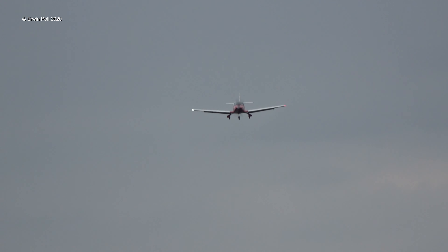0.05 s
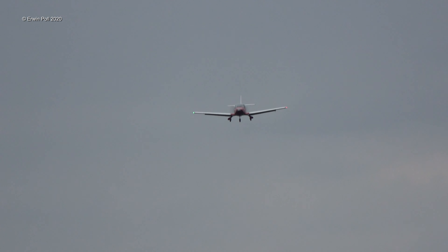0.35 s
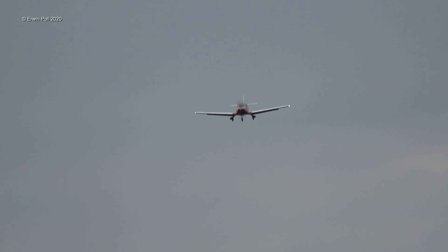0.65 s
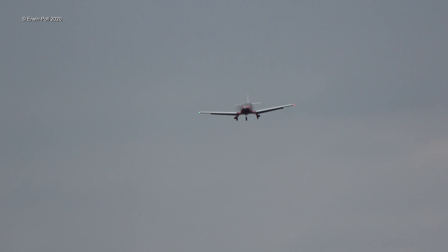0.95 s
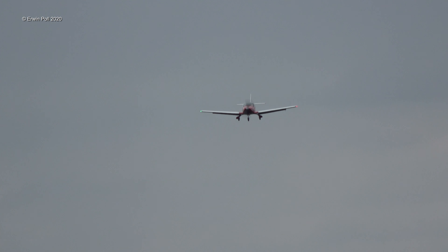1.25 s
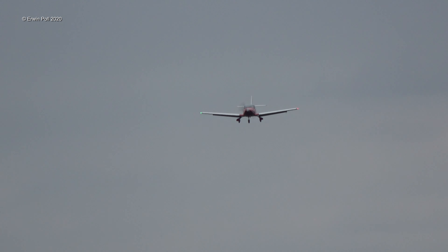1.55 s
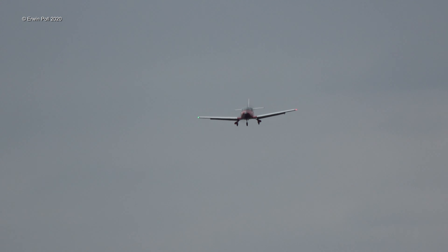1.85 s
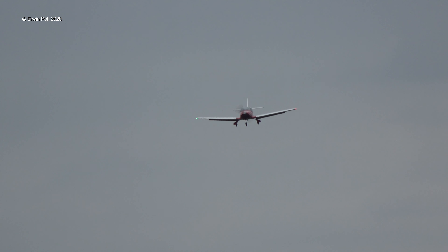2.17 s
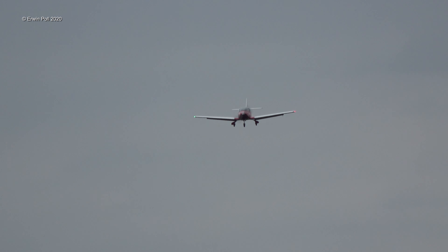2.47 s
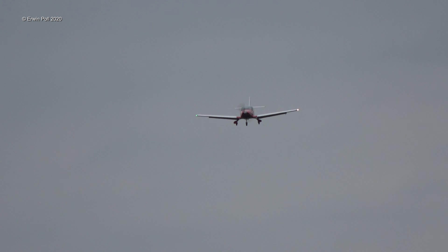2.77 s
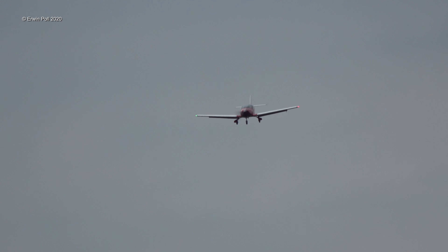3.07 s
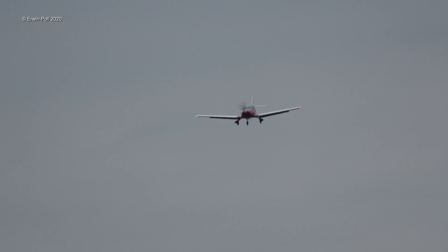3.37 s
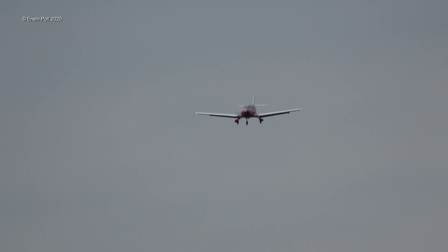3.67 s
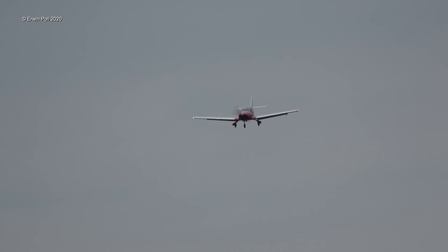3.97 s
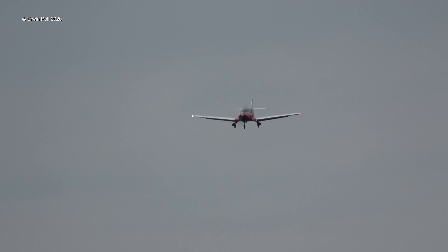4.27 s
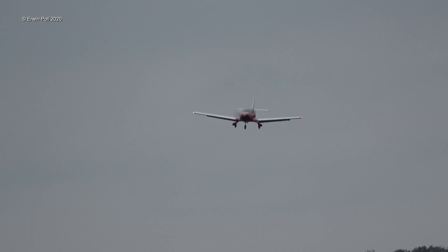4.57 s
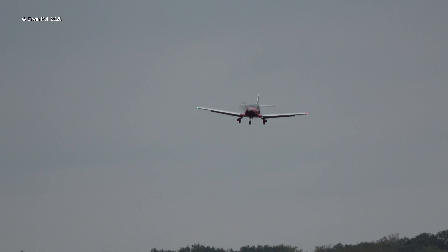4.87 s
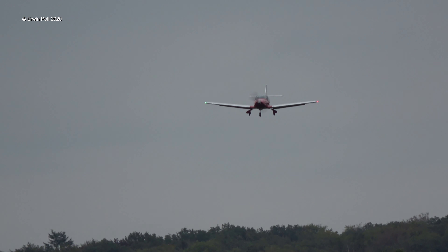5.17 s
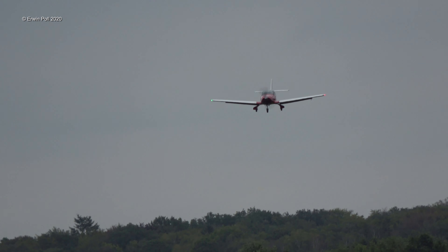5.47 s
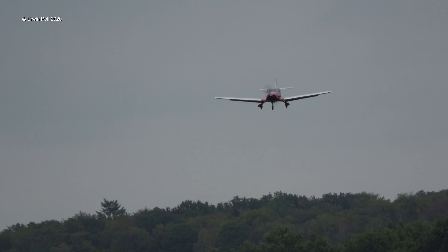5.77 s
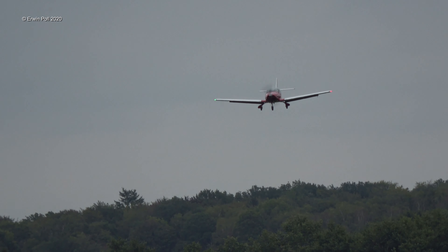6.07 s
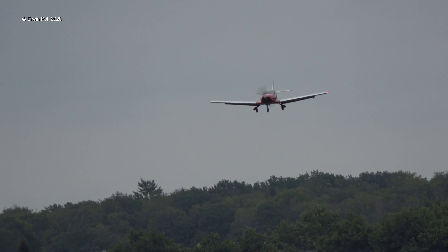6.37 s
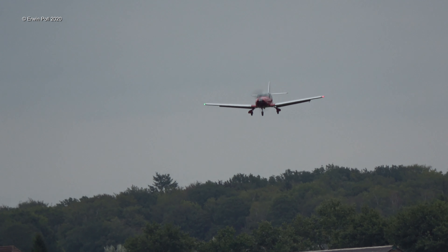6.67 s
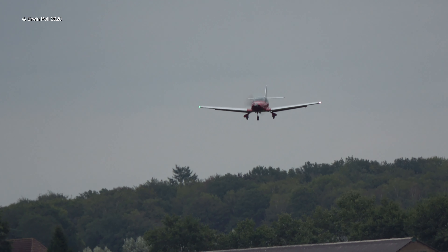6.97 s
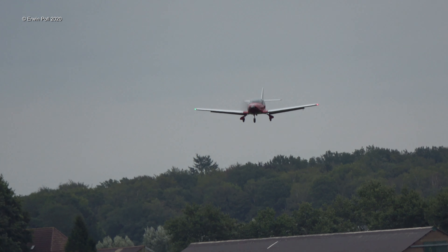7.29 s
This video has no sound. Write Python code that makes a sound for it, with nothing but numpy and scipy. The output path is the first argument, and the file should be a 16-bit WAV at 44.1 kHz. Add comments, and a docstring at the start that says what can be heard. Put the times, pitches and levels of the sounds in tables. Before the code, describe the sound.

A small propeller plane approaches with its engine throttled back, throbbing and crackling louder as wind gusts buffet the microphone.

```python
"""From the edge of an airfield: a light aircraft glides in on final approach, piston engine throttled back.
At first it is some 340 m off, a throb of propeller and exhaust with a faint whine and a rush of air,
while gusts buffet the microphone and briefly pin its diaphragm. The ground returns the aircraft's hiss
and whine about 10 ms late. Past halfway the wind eases and the aircraft swells as it closes to
about 120 m, its exhaust rasping, spitting and cracking ever harder."""
import sys
import numpy as np
from scipy import signal
from scipy.fft import rfft, irfft, next_fast_len
from scipy.io import wavfile
from scipy.ndimage import uniform_filter1d, map_coordinates

SR = 44100
rng = np.random.default_rng(int(sys.argv[2]) if len(sys.argv) > 2 else 0)


def wav_record(signal):
    """Record a signal, one row per channel, as 16-bit PCM in the file named by sys.argv[1]."""
    frames = np.transpose(np.atleast_2d(signal))
    bounded = np.clip(frames, -1, 1)
    # unit amplitude maps onto the largest positive 16-bit level
    quanta = np.round(bounded * 32767).astype(np.int16)
    wavfile.write(sys.argv[1], SR, quanta)


N = 327663
TIME = np.arange(N) / SR

# background of the open airfield: frequency_hz, relative_db
FIELD_SPECTRUM = [(40, 7), (150, -2), (300, 2.5), (430, -6), (600, -4), (1250, -3), (2500, -15),
                  (6000, -16), (10000, -29), (15500, -42)]
# faint left-right difference in that background: frequency_hz, relative_db
SIDE_SPECTRUM = [(30, 33), (300, -7.5), (600, -2.5), (3000, -31.5), (15000, -41.5)]
# eddies at the microphone: frequency_hz, relative_db
EDDY_SPECTRUM = [(5, 8), (11, 13), (22, -5), (35, -4.5), (50, -6.5), (80, -21.5), (150, -33), (300, -66),
                 (1000, -108)]
# light wind between the gusts: time_s, level_db
BREEZE_LEVEL = [(0, -21.5), (3.4, -21), (4.3, -22.5), (5.4, -28.5), (7.43, -24.5)]
# gusts on the microphone: crest_s, length_s, level_db, rocking_hz
MIC_GUSTS = [(0.044, 0.25, -7, 28), (0.148, 0.084, 0.5, 19.45), (0.232, 0.12, -1, 16.09),
             (0.345, 0.11, -9, 18.74), (0.428, 0.08, -8.5, 16), (0.647, 0.066, -6.5, 22),
             (0.928, 0.11, -5.5, 25), (0.99, 0.026, 2, 20.74), (1.064, 0.045, 1.5, 24.98),
             (1.115, 0.032, 0, 19.92), (1.184, 0.04, -0.5, 19.6), (1.239, 0.06, -5.5, 15.73),
             (1.34, 0.06, -5, 15.72), (1.42, 0.087, -14, 16.11), (1.499, 0.14, -5.5, 14),
             (1.772, 0.08, -9, 14), (2.006, 0.021, -2, 22), (2.144, 0.18, -6.5, 15.04),
             (2.252, 0.04, -2.5, 19), (2.465, 0.082, -4, 17), (2.627, 0.074, -9, 21),
             (2.753, 0.038, -1, 21), (2.855, 0.1, -7.5, 13.86), (3.019, 0.13, -8, 13.44),
             (3.185, 0.05, -6.5, 21.9), (3.223, 0.025, -1, 20.4), (3.264, 0.025, -1.5, 24.2),
             (3.315, 0.065, -4, 20.7), (3.453, 0.13, -12, 14.66), (3.622, 0.048, -10, 18),
             (3.883, 0.22, -17, 18), (4.192, 0.083, -17, 15), (4.608, 0.11, -18.5, 15),
             (5.009, 0.088, -9.5, 16), (6.372, 0.14, -16, 18), (6.439, 0.095, -9.5, 20),
             (6.65, 0.11, -16.5, 13), (7.105, 0.087, -11, 23)]
# thuds of the hardest eddies: crest_s, level_db, upper_edge_hz, side_db
EDDY_THUDS = [(0.125, -26.5, 230, -12), (0.166, -16, 80, -39), (0.236, -20.5, 150, -41),
              (0.649, -19, 69, -39), (0.925, -28.5, 297, -5), (0.954, -18, 100, -5), (1.055, -18, 140, -31),
              (1.07, -30.5, 188, -35), (1.098, -33, 250, -34), (1.192, -28.5, 121, -33),
              (2.253, -24, 62, -34), (2.486, -24, 61.7, -40), (2.633, -24, 70, -37),
              (2.752, -22.5, 70, -40), (3.249, -34, 220, -37)]
# gusts that pin the diaphragm: centre_s, length_s, depth_db
MIC_STALLS = [(0.134, 0.021, -14), (0.94, 0.03, -37), (2.031, 0.017, -25)]
# lag of the ground reflection at the microphone: time_s, lag_ms
GROUND_LAG = [(0, 9.77), (3.9, 9.82), (5, 10.05), (6, 10.25), (7.43, 10.8)]
# the treble lies deep at first, then swells and fades: time_s, gain_db
TREBLE_SWING = [(0, -14), (.8, -19), (1.12, -25.5), (1.52, -1), (3.0, -1), (3.95, 1), (4.3, 0), (4.95, 6),
                (5.35, -2.5), (5.8, -4.5), (6.08, 2.5), (6.5, -3), (6.93, 2.5), (7.15, -4.5), (7.43, -5.5)]
# air over propeller and airframe: frequency_hz, relative_db
RUSH_SPECTRUM = [(150, 7.5), (300, -3.5), (420, -4.5), (650, 3), (1000, 0.5), (1600, 0), (2200, -1),
                 (2650, -6.5), (3300, -4), (4300, -9), (5500, -10.5), (8000, -17.5), (10000, -21),
                 (15500, -27)]
# slow swell of that air: time_s, gain_db
AIR_SWELL = [(0, 1), (1.2, -0.5), (2.6, -0.5), (4.5, 0), (6, 2), (7, 1.9), (7.43, 2.5)]
# crankshaft speed: time_s, turns_per_s
CRANK_SPEED = [(0.3, 32.741), (1.3, 32.572), (2.0, 32.799), (2.75, 32.885), (3.55, 32.472), (4.15, 33.146),
               (4.7, 32.361), (5.15, 32.968), (5.8, 32.765), (6.3, 32.786), (6.7, 32.997)]
# whining engine tones: pitch_hz, width_hz, level_db
WHINE_TONES = [(509.8, 11.13, -62.5), (529.7, 7, -59.5), (611, 9, -72), (805, 5, -62.5), (1151, 16, -62)]
# throaty resonances of the exhaust pipe: centre_hz, width_hz, relative_db
PIPE_RESONANCES = [(967, 300, -1.5), (1514, 206, -1.5)]
# hiss of an exhaust puff: frequency_hz, relative_db
PUFF_SPECTRUM = [(400, -9), (900, -11.5), (1700, -12), (2100, -3), (2650, -19), (3400, -1), (4200, 3),
                 (5500, 1.5), (7200, 2), (9000, -3.5), (12500, -13.5), (15500, -28)]
# snap at the front of a puff: frequency_hz, relative_db
SNAP_SPECTRUM = [(1500, -13), (3500, 5.5), (7200, -4.5), (10000, -7.5), (15500, -5)]
# the sharpest exhaust cracks: near_s, high_whistle_db, high_whistle_hz, low_whistle_db, hiss_db
EXHAUST_CRACKS = [(3.415, -40.5, 3840, -43, -53), (2.077, -42, 3205, -40.5, -50),
                  (4.091, -50, 3380, -50, -43.5), (4.119, -45, 3090, -44, -44), (4.24, -46, 3490, -50, -43),
                  (4.152, -44, 3490, -50, -41.5), (4.272, -42, 3410, -47, -40.5),
                  (4.36, -48, 3390, -39, -40), (4.455, -38, 3434, -57, -44), (4.545, -37.5, 3480, -52, -45),
                  (4.637, -47, 3570, -34, -40), (4.883, -39, 3880, -41, -46), (4.945, -37, 3474, -56, -44),
                  (4.575, -35, 3430, -57, -41.5), (4.606, -39, 3520, -43, -37),
                  (4.853, -44, 3526, -42, -36), (4.975, -32.5, 3370, -49, -42),
                  (5.005, -36, 3440, -32, -39), (5.097, -39, 3395, -35, -42), (5.248, -37, 3490, -36, -47),
                  (5.339, -35.5, 3410, -37, -46), (5.368, -33.5, 3090, -49, -47),
                  (5.43, -34.5, 3410, -53, -45), (5.582, -42, 3450, -55, -36.5),
                  (5.612, -36, 3570, -35, -40), (5.704, -35, 3440, -35, -37), (5.766, -32, 3600, -50, -41),
                  (5.827, -34.5, 3360, -36, -40.5), (5.858, -38, 3840, -37.5, -46),
                  (5.888, -40, 3740, -39, -41), (6.132, -42, 3550, -45, -38.5), (6.68, -42, 3490, -34, -44),
                  (6.71, -37, 3035, -33, -43), (6.892, -38, 3150, -51, -43), (7.013, -36, 3330, -52, -39),
                  (6.010, -37, 3700, -52, -36.5), (6.100, -33.5, 3020, -44, -36),
                  (6.800, -26, 3370, -39, -37.5), (6.832, -49, 3400, -32, -42),
                  (6.923, -32, 3420, -29.5, -34), (6.952, -33, 4020, -36, -36),
                  (7.105, -30, 3460, -36, -40), (7.165, -33, 3345, -34, -37.5),
                  (7.347, -40, 3660, -38, -33.5), (7.378, -31, 3120, -49, -36),
                  (7.407, -33, 3300, -34, -38)]
# tones of the two-bladed propeller: crank_multiple, relative_db
PROPELLER_ORDERS = [(2, 5), (4, 0.5), (6, -16), (8, -32), (12, -35)]
# exhaust boom; uneven cylinders give half orders: crank_multiple, relative_db
BOOM_ORDERS = [(1, -24), (2.5, -4.5), (3, 5.5), (3.5, -5), (4.5, -35.5), (5, -8), (5.5, -26), (6.5, -23),
               (7, -21), (9, -33), (11, -54.5)]
# every second cycle differs, so the engine lopes: crank_multiple, relative_db
LOPE_ORDERS = [(2.25, -26), (2.75, -16.5), (3.75, -20), (4.25, -39), (4.75, -21), (5.75, -35.5)]

START_DISTANCE_M, CLOSING_M_PER_S = 336.3, 28.75
FIRING_TURN, BLADE_TURN, BOOM_TURN = .78, .02, 3.27   # crank positions of puff, blade passage and boom
# base level at the starting distance, and the dB gained for each dB of nearness
RUSH_DB, RUSH_GROWTH = -48, 1.26
RASP_DB, RASP_GROWTH = -69, 2.88
SPIT_DB, SPIT_GROWTH = -57, 2
DRONE_DB, DRONE_GROWTH = -31.5, 1.376
WHINE_GROWTH, LOPE_GROWTH = 0.13, 0.64
HIGH_WHISTLE_HZ, LOW_WHISTLE_HZ = 3403, 2130   # of the exhaust stack
SNAP_DELAY_S, SNAP_KNEE_DB, SNAP_STEEPENING = .001, -41.5, 0.73   # harder puffs snap more sharply


def from_db(db):
    return 10 ** (np.asarray(db) / 20)


def rms_one(x):
    return x / np.sqrt(np.mean(x ** 2) + 1e-20)


def in_time(rows):
    """Each column after the time column, sample by sample."""
    time_s, *columns = np.transpose(rows)
    return [np.interp(TIME, time_s, column) for column in columns]


def shaped_noise(gain_at):
    """Noise of rms 1 whose spectrum is the given function of frequency."""
    size = next_fast_len(N)
    hz = np.maximum(np.fft.rfftfreq(size, 1 / SR), 1)
    return rms_one(irfft(rfft(rng.standard_normal(size)) * gain_at(hz), size)[:N])


def noise(spectrum):
    """Noise of rms 1 coloured by rows of frequency_hz, relative_db."""
    points_hz, db = np.transpose(spectrum)
    return shaped_noise(lambda hz: from_db(np.interp(np.log(hz), np.log(points_hz), db)))


def drift(rate_hz):
    """A smooth random wander with spread 1."""
    step = 32
    size = next_fast_len(N // step + 2)
    rolloff = np.exp(-(np.fft.rfftfreq(size, step / SR) / rate_hz) ** 2)
    slow = irfft(rfft(rng.standard_normal(size)) * rolloff, size)
    return np.interp(np.arange(N) / step, np.arange(size), rms_one(slow))


def bursts(starts_s, levels_db, rise_s):
    """Envelope of puffs that swell to their level and die away."""
    kicks = np.zeros(N)
    kicks[np.clip(np.round(starts_s * SR).astype(int), 0, N - 1)] = from_db(levels_db)
    decay = np.exp(-1 / (rise_s * SR))
    return signal.lfilter([0, np.e * decay / (rise_s * SR)], [1, -2 * decay, decay ** 2], kicks + 1e-18)


def airfield():
    """The steady hush of open ground around the microphone."""
    return from_db(-49.5) * noise(FIELD_SPECTRUM)


def wind(rocking_db, eddy_db, wander):
    """Each gust rocks the diaphragm at its own pace; finer eddies ride on gusts and breeze."""
    bells = (from_db(db) * np.exp(-(2 * (TIME - s) / length) ** 2) for s, length, db, _ in MIC_GUSTS)
    gusts = np.sqrt(sum(bell ** 2 for bell in bells))
    rocking_hz = in_time(MIC_GUSTS)[2] * np.exp(wander * drift(40.7))
    rocking = rms_one(np.sin(2 * np.pi * (np.cumsum(rocking_hz) / SR + rng.random())))
    eddies = noise(EDDY_SPECTRUM)
    eddies /= np.sqrt(uniform_filter1d(eddies ** 2, size=3500) + 0.0083)   # even out their level
    eddy_gain = np.hypot(from_db(eddy_db) * gusts, from_db(in_time(BREEZE_LEVEL)[0]))
    rumble = from_db(rocking_db) * gusts * rocking + eddy_gain * eddies
    return signal.sosfilt(signal.butter(1, 5, "high", fs=SR, output="sos"), rumble)


def thuds(gain_db, rise_s, low_hz):
    """The hardest eddies thud, a little differently on each side of the microphone."""
    out, age = np.zeros((2, N)), TIME[:SR // 5]
    envelope = age / rise_s * np.exp(1 - age / rise_s)
    for crest_s, db, edge_hz, side_db in EDDY_THUDS:
        dull = signal.butter(2, [low_hz, edge_hz], "band", fs=SR, output="sos")
        eddy = signal.sosfilt(dull, rng.standard_normal((2, 2 * len(age))))[:, len(age):] * envelope
        mid, side = eddy * np.linalg.norm(envelope) / np.linalg.norm(eddy, axis=1, keepdims=True)
        thud = mid + from_db(side_db) * np.array([side, -side])
        start = int((crest_s - rise_s) * SR)
        out[:, start:start + len(age)] += from_db(db + gain_db) * thud
    return out


def mic_sensitivity():
    """A pinned diaphragm passes hardly any sound, and comes free abruptly."""
    return from_db(sum(db * np.exp(-(2 * (TIME - s) / length) ** 8) for s, length, db in MIC_STALLS))


def nearness_db():
    """Gain by spherical spreading as the aircraft closes on the microphone at a steady speed."""
    distance_m = START_DISTANCE_M - CLOSING_M_PER_S * TIME
    return 20 * np.log10(START_DISTANCE_M / distance_m)


def over_ground(direct, share):
    """The ground bounce combs the sound; the comb slides down as the aircraft nears."""
    lag_s = in_time(GROUND_LAG)[0] / 1000
    return direct + share * map_coordinates(direct, [(TIME - lag_s) * SR], order=3)


def treble_tilt(x, treble_db, edge_hz):
    """Raises or lowers what lies above the edge."""
    low = signal.sosfiltfilt(signal.butter(2, edge_hz, fs=SR, output="sos"), x)
    return low + from_db(treble_db) * (x - low)


def engine_whine(waver_db):
    """A few engine tones, each wandering a little in pitch and level."""
    tones = 0
    for pitch_hz, width_hz, db in WHINE_TONES:
        phase = 2 * np.pi * np.cumsum(pitch_hz + width_hz / 2 * drift(13.6)) / SR
        tones += from_db(db + waver_db * drift(25.0)) * rms_one(np.sin(phase))
    return tones


def rushing_air(turns, rush_db, chop, flutter_db):
    """Broad noise of propeller and airframe, chopped by two blades and stirred by the air on its way."""
    blades = 1 + chop * np.cos(4 * np.pi * (turns - FIRING_TURN))
    return from_db(rush_db + flutter_db * drift(58)) * blades * noise(RUSH_SPECTRUM)


def exhaust_rasp(turns, rasp_db, grain_db, pulsing):
    """The pipe resonances growl unevenly under the two firings of each turn."""
    beat = 1 + pulsing * np.cos(4 * np.pi * (turns - FIRING_TURN))
    growl = 0
    for centre_hz, width_hz, db in PIPE_RESONANCES:
        ring = shaped_noise(lambda hz: 1 / (1 + (2 * (hz - centre_hz) / width_hz) ** 2))
        growl += from_db(db + grain_db * np.tanh(drift(37))) * ring
    return from_db(rasp_db) * beat * growl


def stack_whistle(firings_s, pitches_hz, smear):
    """A hoarse tone of the exhaust stack that takes a new pitch at each puff."""
    latest = np.clip(np.searchsorted(firings_s, TIME) - 1, 0, None)
    return rms_one(np.sin(2 * np.pi * np.cumsum(pitches_hz[latest]) / SR + smear * drift(240)))


def exhaust_spit(turns, spit_db, snap_db, scatter_db, lope_db, sputter_db):
    """Once a turn the stack spits a snap, a puff of hiss and two whistles, harder every second turn."""
    count = np.arange(int(turns[-1]))
    firings_s = np.interp(count + FIRING_TURN, turns, TIME)
    chance = rng.uniform(-1, 1, (len(count), 6)).T
    level_db = np.interp(firings_s, TIME, spit_db) + scatter_db * chance[0] + lope_db * (-1) ** count
    hiss_db = level_db - 0.5
    high_db = level_db + 1 + 3 * chance[1]
    low_db = level_db - 1 + 4 * chance[2]
    high_hz = HIGH_WHISTLE_HZ * (1 + 0.13 * chance[3])
    low_hz = LOW_WHISTLE_HZ * (1 + 0.064 * chance[4])
    # each sharp crack takes over the firing nearest to it
    near_s, *cracks = np.transpose(EXHAUST_CRACKS)
    nearest = np.abs(firings_s[:, None] - near_s).argmin(axis=0)
    high_db[nearest], high_hz[nearest], low_db[nearest], hiss_db[nearest] = cracks
    sputter = from_db(sputter_db * np.tanh(drift(450)))
    puffs = bursts(firings_s, hiss_db - 0.5, rise_s=0.0019) * sputter * noise(PUFF_SPECTRUM)
    high = bursts(firings_s, high_db, rise_s=0.0014) * stack_whistle(firings_s, high_hz, smear=0.82)
    low = bursts(firings_s, low_db, rise_s=0.0019) * stack_whistle(firings_s, low_hz, smear=0.71)
    front_db = hiss_db + snap_db + SNAP_STEEPENING * (hiss_db - SNAP_KNEE_DB) + 3 * chance[5]
    snaps = bursts(firings_s + SNAP_DELAY_S, front_db, rise_s=0.00033) * noise(SNAP_SPECTRUM)
    return puffs + snaps + high + low


def crank_pulses(orders, turns, pipe_q=0, pipe_order=3):
    """A pulse train locked to the crank; a resonant pipe shifts the phases so each pulse rings on."""
    pulses = 0
    for multiple, db in orders:
        pipe_phase = np.arctan(pipe_q * (multiple / pipe_order - pipe_order / multiple))
        pulses += from_db(db) * np.cos(2 * np.pi * multiple * turns - pipe_phase)
    return pulses


def drone(turns, drone_db, lope_db, waver_db, pipe_q):
    """Each blade sends a dip in pressure; the exhaust booms between them, throbbing with the cycle."""
    blades = -crank_pulses(PROPELLER_ORDERS, turns - BLADE_TURN)
    boom = crank_pulses(BOOM_ORDERS, turns - BOOM_TURN, pipe_q)
    boom += from_db(lope_db) * crank_pulses(LOPE_ORDERS, turns - BOOM_TURN, pipe_q)
    return rms_one(blades + boom * from_db(waver_db * drift(29))) * from_db(drone_db)


def scene():
    """Field, wind and aircraft at the microphone, almost the same in both channels."""
    turns = np.cumsum(in_time(CRANK_SPEED)[0]) / SR
    near_db, treble_db = nearness_db(), in_time(TREBLE_SWING)[0]
    spit_db = SPIT_DB + SPIT_GROWTH * near_db + treble_db
    spit = exhaust_spit(turns, spit_db, snap_db=2.0, scatter_db=3.5, lope_db=0.8, sputter_db=3.5)
    rasp = exhaust_rasp(turns, RASP_DB + RASP_GROWTH * near_db, grain_db=5.5, pulsing=0.16)
    rush_db = RUSH_DB + RUSH_GROWTH * near_db + in_time(AIR_SWELL)[0]
    rush = rushing_air(turns, rush_db, chop=0.17, flutter_db=2.02)
    rush = treble_tilt(rush, 0.44 * treble_db, edge_hz=2340)   # takes only part of the treble swing
    whine = from_db(WHINE_GROWTH * near_db) * engine_whine(waver_db=2.5)
    drone_db = DRONE_DB + DRONE_GROWTH * near_db
    throb = drone(turns, drone_db, LOPE_GROWTH * near_db, waver_db=1.25, pipe_q=2.3)
    aircraft = throb + over_ground(rush + rasp + whine, share=0.46) + over_ground(spit, share=0.55)
    mid = (airfield() + aircraft) * mic_sensitivity()
    mid += wind(rocking_db=-2.5, eddy_db=-15.0, wander=0.1303)
    side = from_db(-72.5) * noise(SIDE_SPECTRUM)
    return np.array([mid + side, mid - side]) + thuds(gain_db=0.5, rise_s=0.0045, low_hz=39)


def record(dry):
    """The microphone has a notch in the top octave; peaks are rounded and the top is cut."""
    notch_hz, cutoff_hz = 11050, 15900
    coloured = signal.lfilter(*signal.iirnotch(notch_hz, Q=2.8, fs=SR), dry)
    rounded = coloured / (1 + coloured ** 8) ** (1 / 8)
    return signal.sosfilt(signal.ellip(10, .2, 90, cutoff_hz, fs=SR, output="sos"), rounded)


dry = scene()
out = record(dry)
wav_record(out)
```